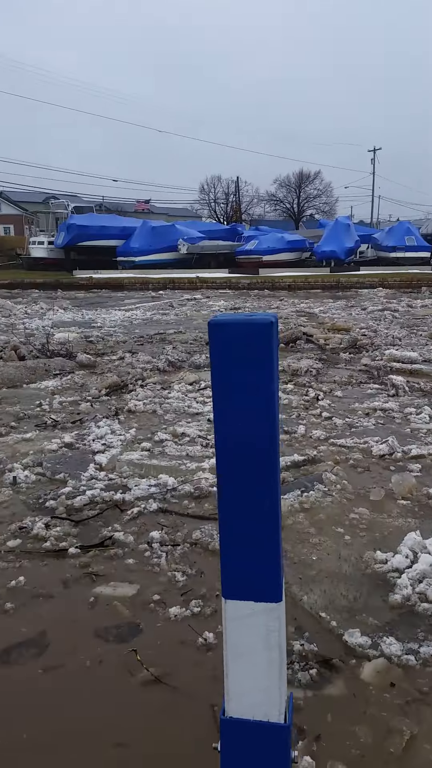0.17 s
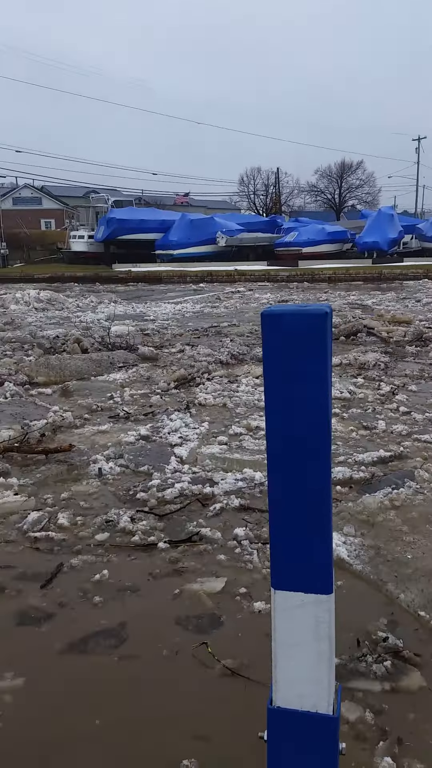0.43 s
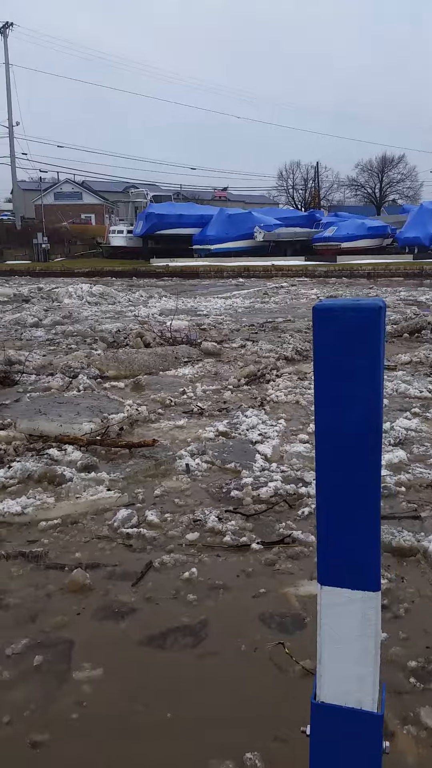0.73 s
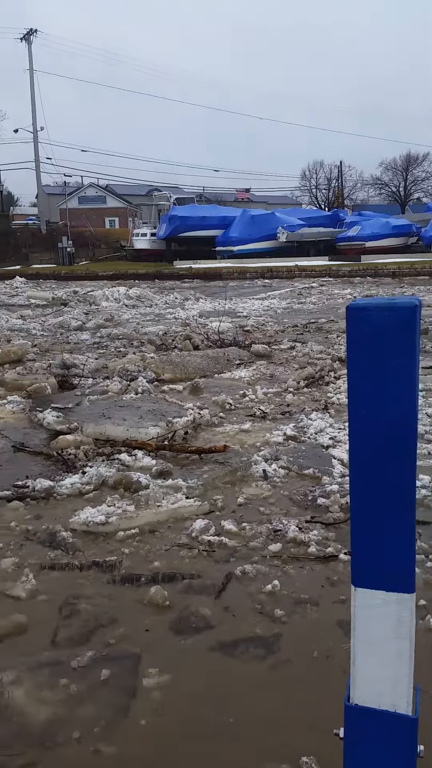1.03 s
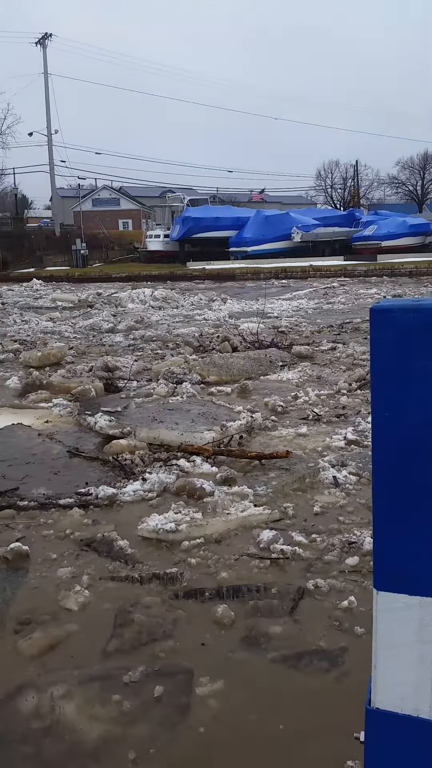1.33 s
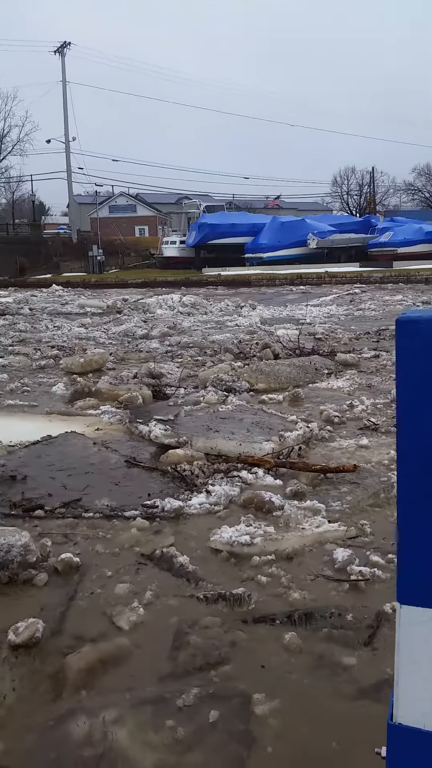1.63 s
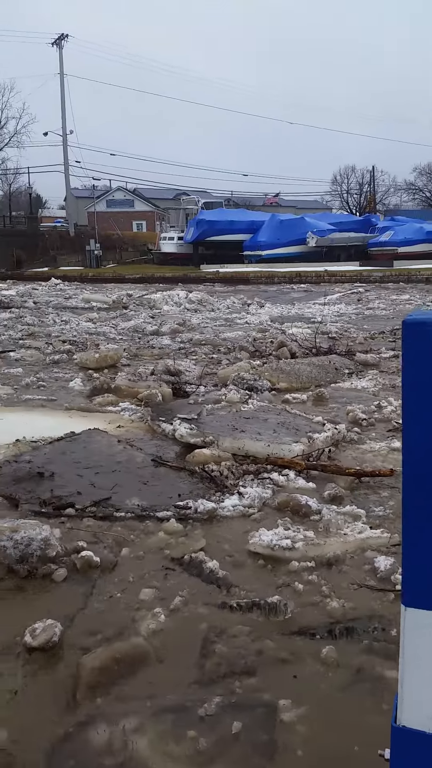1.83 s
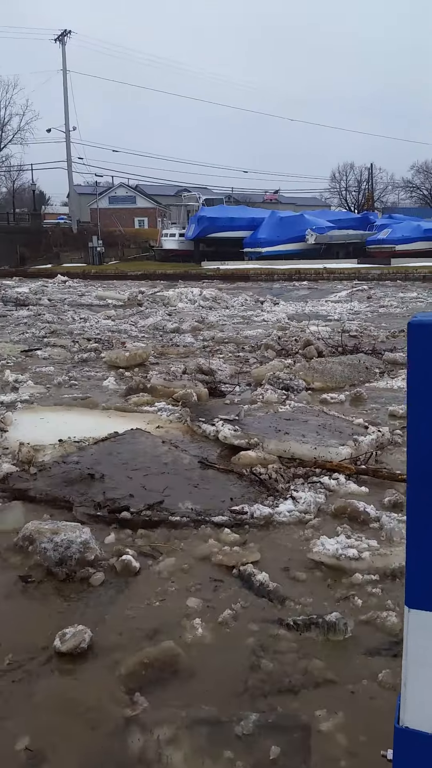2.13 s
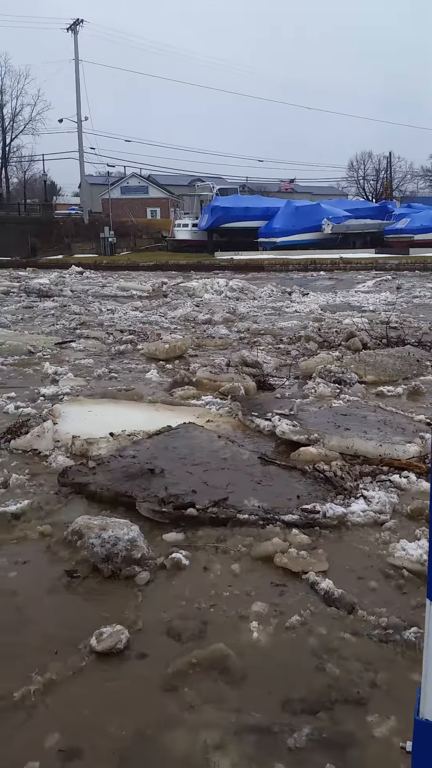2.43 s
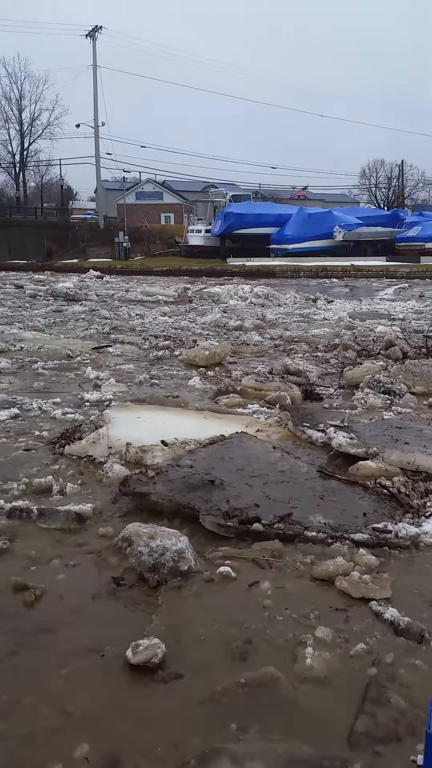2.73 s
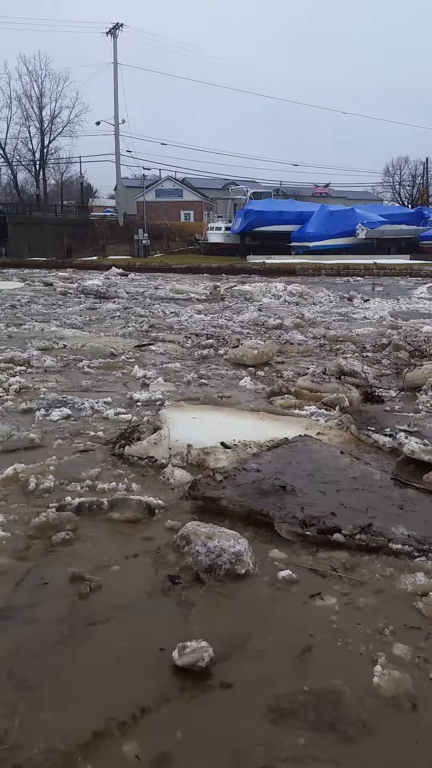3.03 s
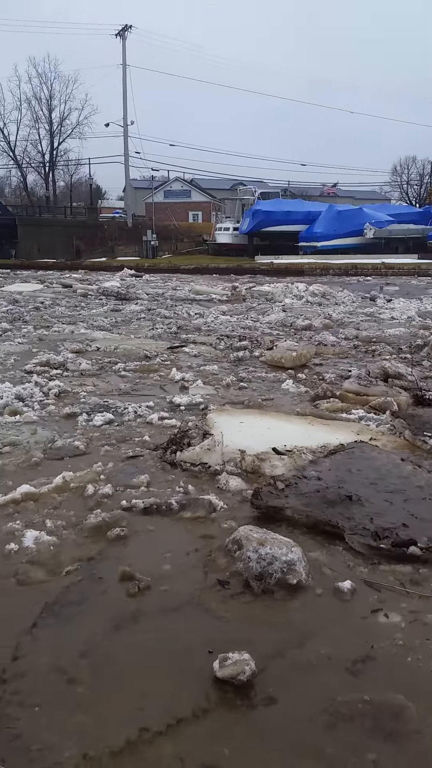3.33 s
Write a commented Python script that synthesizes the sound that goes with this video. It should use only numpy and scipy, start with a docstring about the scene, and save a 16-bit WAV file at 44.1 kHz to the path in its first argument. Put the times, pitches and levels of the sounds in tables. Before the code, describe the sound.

Ice floes crunch, knock and tick in slushy river water, hardest around 1.5 seconds, then the wash swells. Heavy wind rumbles on a hand-held phone outdoors, mostly in the right channel, from the start.

```python
"""Ice floes grind down a river past a hand-held phone with two microphone ports, in gusty wind.
Strong gusts, mostly on the right, open over washing water, light crunches, knocks and icy ticks.
The hardest crunches come near 1.5 s, the water swells towards 1.9 s, then come wind puffs and soft
tones of plopping water and ringing floes. A large floe groans near the end. Water and wind are shaped
noise; crunches mix noise with ringing tones; knocks, soft tones, puffs and the groan are tones;
ticks are snaps of noise."""
import sys
import numpy as np
from scipy import signal
from scipy.fft import rfft, irfft
from scipy.io import wavfile
from scipy.ndimage import uniform_filter1d

SR = 44100
rng = np.random.default_rng(int(sys.argv[2]) if len(sys.argv) > 2 else 0)


def unload_audio(sound):
    """Save the sound as a 16-bit wav file, at the path given as the first command line argument."""
    columns = np.transpose(np.atleast_2d(sound))
    # keep every value between -1 and 1, then stretch to whole-number steps
    steps = np.round(np.clip(columns, -1, 1) * 32767)
    wavfile.write(sys.argv[1], SR, steps.astype(np.int16))


N = 153909  # length in samples, about 3.5 s


def amp(db):
    """Turns dB into an amplitude factor."""
    return 10 ** (np.asarray(db) / 20)


def evened(x):
    """Scales each channel to an RMS of 1."""
    return x / np.sqrt(np.mean(x ** 2, -1, keepdims=True) + 1e-20)


def read(points, hz, order=1):
    """Reads one column of a table along a log-frequency axis."""
    cols = np.transpose(points)
    return np.interp(np.log(hz + 1), np.log(cols[0] + 1), cols[order])


def add(mix, start_s, sound):
    """Adds a short sound to the mix, cut off at the end of the mix."""
    part = mix[:, round(start_s * SR):][:, :sound.shape[1]]
    part += sound[:, :part.shape[1]]


def shaped(x, gain):
    """Colours x by a gain rule of frequency."""
    n = x.shape[-1]
    return irfft(rfft(x) * gain(np.fft.rfftfreq(n, 1 / SR) + 1), n)


def fields(size, rule):
    """Two unrelated noises whose short-time level in dB follows rule(seconds, Hz)."""
    frames = 4 * N // size + 5
    hz = np.fft.rfftfreq(size, 1 / SR)[:, None]
    real, imag = rng.standard_normal((2, 2, frames, len(hz))).swapaxes(2, 3)
    frame_s = np.arange(frames) * size / 4 / SR
    spectra = (real + 1j * imag) * amp(rule(frame_s, hz))
    noise = signal.istft(spectra, nperseg=size, noverlap=3 * size // 4)[1][:, :N]
    return noise * np.sqrt(4 / size)


def swelling(centre_s, db, hz, cycles):
    """A few cycles of a tone that swell and sink around one moment."""
    t = np.arange(N) / SR - centre_s
    envelope = np.exp(-(t * hz / cycles) ** 2)
    return amp(db) * envelope * np.cos(2 * np.pi * (hz * t + rng.random()))


# Strength of the wind. Each row: time in seconds, level in dB before the left-right split,
# left minus right in dB.
WIND_GUSTS = [(0.0, -12.5, -19.5), (0.09, -14.5, -16.5), (0.22, -17.5, -13.5), (0.33, -23.5, -8),
              (0.43, -18.5, -18.5), (0.59, -21.5, -15.5), (0.7, -33.5, -5), (0.82, -37, -2),
              (0.97, -26.5, -10), (1.05, -19.5, -15), (1.19, -23.5, 1), (1.371, -22, -14.5),
              (1.6, -21, 7.5), (1.66, -18.5, -16.5), (1.84, -22, -10), (2.0, -19.5, -4.5),
              (2.08, -17, -10.5), (2.22, -23, -2), (2.33, -24.5, -12), (2.43, -21.5, -20),
              (2.67, -38, -5.5), (2.84, -33, -0.5), (3.03, -30, -7), (3.3, -35, 3.5), (3.402, -26.5, -25),
              (3.49, -34, 10)]
# Basic tone of the buffeting. Each row: frequency in Hz, relative level in dB.
WIND_TONE = [(15, -44), (40, -10), (70, 0), (100, -1.5), (170, -6.5), (250, -13.5), (400, -32), (700, -49),
             (1500, -99)]
# Changing brightness of the buffeting. Each row: time in seconds, extra dB per octave above BRIGHTEN_HZ.
WIND_FLUTTER = [(0, 0), (.5, -1), (.9, 0.5), (1.3, -2.5), (2.0, -6.5), (2.6, -7), (2.88, 14.5), (3.1, -9),
                (3.4, 6.5)]
# BRIGHTEN_DB is dB per octave above BRIGHTEN_HZ for each dB over CALM_DB
BRIGHTEN_DB, BRIGHTEN_HZ, CALM_DB = 0.6347, 99.4, -14
LUMP_DB, LUMP_HZ = 2.0, 25  # size and speed of the random lumps in the level


def wind():
    """Turbulence buffets each port on its own: lumpy noise, with a tilt that brightens as it strengthens."""
    s, db, left_minus_right = np.transpose(WIND_GUSTS)
    left_share = 1 / (1 + amp(-2 * left_minus_right))  # share of the power
    levels = [db + 10 * np.log10(4 * share) for share in (left_share, 1 - left_share)]

    def rule(t, hz):
        level = np.array([np.interp(t, s, v) for v in levels])[:, None]
        tilt = BRIGHTEN_DB * (level - CALM_DB) + np.interp(t, *np.transpose(WIND_FLUTTER))
        octaves = np.log2(np.maximum(hz / BRIGHTEN_HZ, 1))
        tone = read(WIND_TONE, hz) + tilt * octaves
        # take out the tone's own power, so that it does not change the level
        return level + tone - 10 * np.log10((amp(tone) ** 2).mean(1, keepdims=True))

    slow_noise = shaped(rng.standard_normal((2, N)), lambda hz: 1 / (1 + (hz / LUMP_HZ) ** 2))
    lumps = amp(LUMP_DB * evened(slow_noise))
    return fields(size=2048, rule=rule) * lumps / np.sqrt(np.mean(lumps ** 2))


# Single puffs of wind. Each row: time of the swell in seconds, level in dB before the left and
# right settings below, pitch in Hz.
WIND_PUFFS = [(2.17, -12.5, 174), (2.283, -12, 126), (2.303, -11, 147), (2.831, -19.5, 148),
              (2.935, -17, 128)]
PUFF_CYCLES, PUFF_LEFT_DB, PUFF_RIGHT_DB = 0.45, -15, 7


def puffs():
    """Puffs of wind hit the ports as low thumps, less than a full wave long and stronger on the right."""
    thumps = sum(swelling(*row, PUFF_CYCLES) for row in WIND_PUFFS)
    return thumps * amp([[PUFF_LEFT_DB], [PUFF_RIGHT_DB]])


# Swell of the water, before grains and port colour. Each row: time in seconds, low wash level in dB,
# high fizz level in dB.
RIVER_SWELL = [(0, -44, -45.5), (0.451, -46, -43), (.9, -42.5, -44), (1.4, -40.5, -39), (1.65, -39, -32),
               (1.9, -36.5, -33), (2.1, -38, -34), (2.3, -42.5, -36.5), (2.9, -39.5, -35), (3.49, -41, -36)]
SPLIT_HZ = 1040  # wash below, fizz above
FLICKER_DB, PATCH_DB = 1.26, 0.6  # random wavering of the whole level, and of patches of it
GRAINS_PER_S, GRAIN_SPREAD_DB, GRAIN_DB, GRAIN_S = 120, 3.0, -11, 0.0012  # GRAIN_S: fading time


def river():
    """Water washes below and slush fizzes above, in drifting patches sprinkled with tiny grains."""
    s, wash_db, fizz_db = np.transpose(RIVER_SWELL)

    def rule(t, hz):
        high = 1 / (1 + (SPLIT_HZ / (hz + 1)) ** 2)
        patches = rng.standard_normal((len(t), len(hz))).T
        patches = uniform_filter1d(patches, size=6, axis=0)  # smooth over frequency
        patches = uniform_filter1d(patches, size=16, axis=1)  # smooth over time
        flicker = evened(uniform_filter1d(rng.standard_normal(len(t)), size=3))
        level = (1 - high) * np.interp(t, s, wash_db) + high * np.interp(t, s, fizz_db)
        return level + PATCH_DB * patches / patches.std() + FLICKER_DB * flicker

    happens = rng.random(N) < GRAINS_PER_S / SR
    hits = amp(GRAIN_SPREAD_DB * np.minimum(rng.exponential(1, N), 5)) * happens
    fading = np.exp(-np.arange(600) / SR / GRAIN_S)
    grains = evened(signal.oaconvolve(hits, fading)[:N])
    return fields(size=512, rule=rule) * np.sqrt(1 + (amp(GRAIN_DB) * grains) ** 2)


# Short soft tones of water plopping and, at 2.54 and 3.345 s, of floes ringing. Each row: time of the
# swell in seconds, peak level in dB before the port colour, pitch in Hz.
SOFT_TONES = [(2.105, -40, 950), (2.142, -36, 1076), (2.303, -32, 1220), (2.54, -39.5, 785),
              (3.345, -39, 686)]
SOFT_TONE_CYCLES = 3.4


def soft_tones():
    """Plopping water and ringing floes: each a short tone that swells and sinks at a steady pitch."""
    return sum(swelling(*row, SOFT_TONE_CYCLES) for row in SOFT_TONES)


GROAN_HZ, GROAN_DB, GROAN_START_S, GROAN_RISE_S = 102, -47.5, 3.073, 0.18
GROAN_WAVER_HZ = 23  # upper limit of the wavering


def groan():
    """A large floe groans: a low note swells in while its phase and level waver."""
    t = np.arange(N) / SR
    waver = evened(shaped(rng.standard_normal(N), lambda hz: 1 / (1 + (hz / GROAN_WAVER_HZ) ** 2)))
    note = np.sin(2 * np.pi * GROAN_HZ * t + 0.52 * waver) * amp(2.0 * waver[::-1])
    return amp(GROAN_DB) * note * np.clip((t - GROAN_START_S) / GROAN_RISE_S, 0, 1)


KNOCKS_PER_S, KNOCK_SPREAD_DB, KNOCK_DB = 200, 2.5, -10  # KNOCK_DB: compared with the wash level
KNOCK_T60_S = 0.03  # time to fade by 60 dB
KNOCK_LOW_HZ, KNOCK_HIGH_HZ = 401, 2500


def knocks():
    """Small lumps of ice bump at random as short fading tones, louder where the wash swells."""
    happens = rng.random(N) < KNOCKS_PER_S / SR
    hits = amp(KNOCK_SPREAD_DB * np.minimum(rng.exponential(1, N), 4)) * happens
    lump = rng.integers(0, 16, N)  # which of 16 pitches each hit sounds
    t = np.arange(4096) / SR
    fading = amp(-60 * t / KNOCK_T60_S)
    out = np.zeros(N)
    for k, hz in enumerate(np.geomspace(KNOCK_LOW_HZ, KNOCK_HIGH_HZ, 16)):
        out += signal.oaconvolve(hits * (lump == k), fading * np.sin(2 * np.pi * hz * t))[:N]
    s, wash_db, _ = np.transpose(RIVER_SWELL)
    return amp(KNOCK_DB + np.interp(np.arange(N) / SR, s, wash_db)) * evened(out)


TICK_S = 0.0011  # from the start to the strongest moment
TICK_OCTAVES = 0.55  # spread around the pitch


def tick(db, tick_hz):
    """A very short snap of noise, strongest around its pitch."""
    t = np.arange(1024) / SR
    snap = rng.standard_normal((2, 1024)) * np.exp(-(t / TICK_S - 1) ** 2 * 2)
    return amp(db) * shaped(snap, lambda hz: np.exp(-(np.log2(hz / tick_hz) / TICK_OCTAVES) ** 2))


# Brittle ticks of thin ice. Each row: start in seconds, level in dB of the snap before it is
# narrowed to its pitch, pitch in Hz.
ICE_TICKS = [(0.1337, -19, 6330), (0.3643, -16.5, 14400), (0.9882, -22, 13000), (1.0181, -24, 7400),
             (1.6217, -15, 9000), (2.204, -21, 11100), (2.2648, -22, 14000), (2.7566, -18, 9000),
             (2.865, -13, 8700), (2.8866, -23, 13000), (2.9708, -16, 9000), (3.1575, -23.5, 13000)]


def add_ticks(mix):
    """Thin ice snaps at the listed moments."""
    for start_s, *row in ICE_TICKS:
        add(mix, start_s, tick(*row))


# Overtones of a ringing floe. Each row: multiple of the ring pitch, level in dB against the main tone.
FLOE_OVERTONES = [(1.362, -6.5), (2.02, -7.5)]
CRUNCH_RISE_S, GRIT_DB = 0.005, 3.5  # GRIT_DB: roughness of the push
RING_WIDTH_HZ = 85  # a wider ring dies away sooner
RASP_LOW_HZ, RASP_TILT_DB = 377, 1  # bottom of the rasp, and its rise in dB per octave


def crunch(db, ring_hz, length_s, ring_share, top_hz):
    """Ice breaks in a gritty burst: noise gives the rasp, and the same push rings the floe."""
    t = np.arange(8192) / SR
    noise, grit = rng.standard_normal((2, 8192)), rng.standard_normal(8192)
    shape = np.minimum(t / CRUNCH_RISE_S, 1) * np.exp(-(t / length_s) ** 2)
    push = shape * amp(GRIT_DB * evened(uniform_filter1d(grit, size=60)))

    decay = np.exp(-np.pi * RING_WIDTH_HZ / SR)
    ring_level = signal.lfilter([1], [1, -decay], push)
    tones = np.zeros(len(t))
    for multiple, part_db in [(0.99, 0), *FLOE_OVERTONES]:  # main tone first
        tones += amp(part_db) * np.sin(2 * np.pi * (multiple * ring_hz * t + rng.random()))
    ring = ring_level * tones

    def rasp_gain(hz):
        tilt = amp(RASP_TILT_DB * np.log2(hz))
        return tilt / (1 + (hz / top_hz) ** 4) / (1 + (RASP_LOW_HZ / hz) ** 2)

    rasp = shaped(noise * push, rasp_gain)
    share = np.clip(ring_share, 0, 1)
    blend = (1 - share) * evened(rasp) + share * evened(ring)
    return amp(db) * blend * np.sqrt(np.mean(shape ** 2))


# Floes crunching. Each row: start in seconds, level in dB before the burst's shape and port colour,
# ring pitch in Hz, length in seconds, ring share from 0 to 1, top of the rasp in Hz.
FLOE_CRUNCHES = [(0.303, -41.5, 1190, 0.035, 0, 3400), (0.345, -39.5, 447, 0.046, 0.3, 2500),
                 (0.605, -32.5, 683, 0.019, 0.37, 3330), (0.634, -40, 880, 0.018, 0, 4000),
                 (0.741, -38.5, 245, 0.022, 0.6, 1480), (1.094, -35, 550, 0.015, 0.43, 2300),
                 (1.111, -32, 554, 0.032, 0.36, 2330), (1.142, -31, 550, 0.031, 0.47, 2780),
                 (1.472, -27, 173.8, 0.033, 0.43, 1420), (1.469, -25, 629, 0.041, 0.2, 15200),
                 (1.505, -31, 188.4, 0.022, 0.4, 1500), (1.506, -21.5, 809, 0.022, 0.21, 13700),
                 (1.568, -30.5, 972, 0.022, 0.3, 2860), (1.942, -35, 870, 0.047, 0.3, 2500),
                 (2.402, -38.5, 1240, 0.04, 0.2, 4100), (3.013, -35.5, 572, 0.026, 0.35, 2980)]


def add_crunches(mix):
    """Floes grind together at the listed moments."""
    for start_s, *row in FLOE_CRUNCHES:
        add(mix, start_s, crunch(*row))


# Colour of river and ice through each port. Each row: frequency in Hz, left gain in dB, right gain in dB.
PORT_COLOUR = [(151, 23, 23), (266, 16, 14.5), (594, 8.5, 4.5), (910, 7.5, 2), (1980, 3, -4.5),
               (2830, 0, -4.5), (4970, -8.5, -8.5), (5940, -6.5, -10.5), (7240, 3.5, -10),
               (9000, -9, -15.5), (10540, -8.5, -6.5), (13000, -3.5, 6), (14000, -8, 10.5)]
# How alike the two ports hear. Each row: frequency in Hz, likeness from 0 (unrelated) to 1 (the same).
PORT_LIKENESS = [(100, 0.39), (1000, 1), (2000, 0.56), (4000, 0.34), (16000, 0.033)]
LAG_S = 5 / SR


def ports(pair):
    """The ports hear most alike near 1 kHz; the left is a little later and each has its own colour."""
    hz = np.fft.rfftfreq(N, 1 / SR)
    first, second = rfft(pair)
    same = np.clip(read(PORT_LIKENESS, hz), 0, 1)
    later = np.exp(-2j * np.pi * hz * LAG_S)
    left = first * amp(read(PORT_COLOUR, hz, order=1)) * later
    right = same * first + np.sqrt(1 - same ** 2) * second
    right = right * amp(read(PORT_COLOUR, hz, order=2))
    return irfft(np.array([left, right]), N)


def scene():
    """River and ice pass through the port colours; the wind acts on the ports directly."""
    ice = river() + soft_tones() + groan() + knocks()
    add_ticks(ice)
    add_crunches(ice)
    return ports(ice) + wind() + puffs()


CEILING = 0.95  # greatest level the soft overload lets through
EDGE_HZ = 15780  # top of the band


def record(dry):
    """Rounds off the loudest peaks by soft overload, then removes the highest treble."""
    held = CEILING * np.tanh(dry / CEILING)
    band = signal.firwin(1535, EDGE_HZ, window=("kaiser", 10), fs=SR)
    return signal.oaconvolve(held, band[None], "same")


dry = scene()
out = record(dry)
unload_audio(out)
```